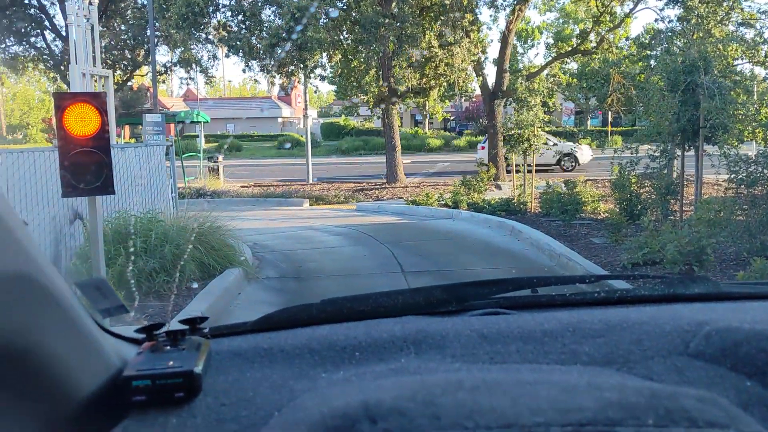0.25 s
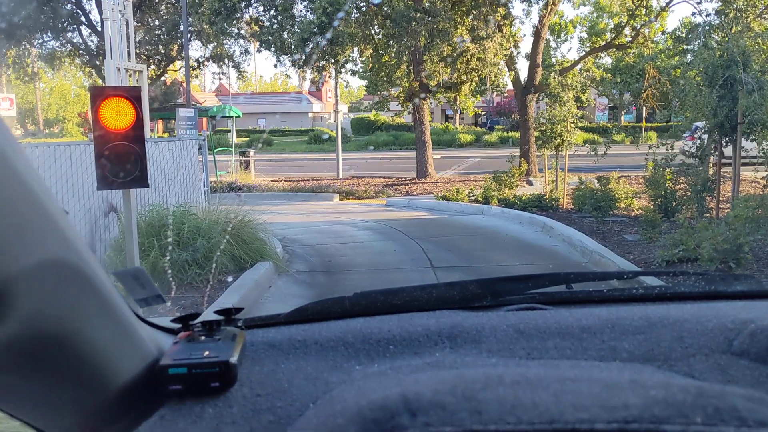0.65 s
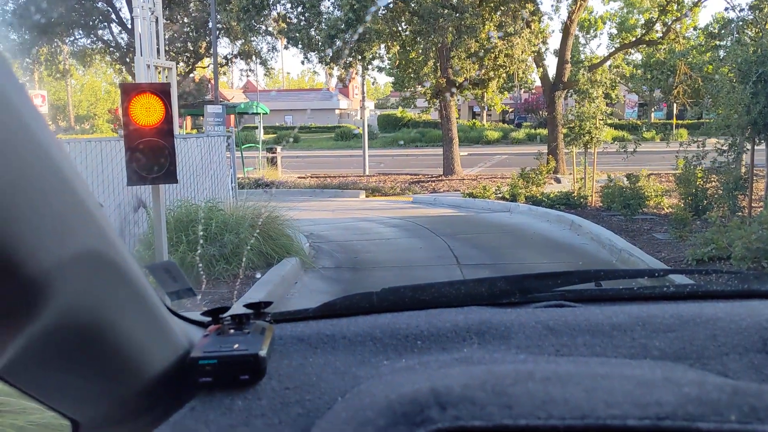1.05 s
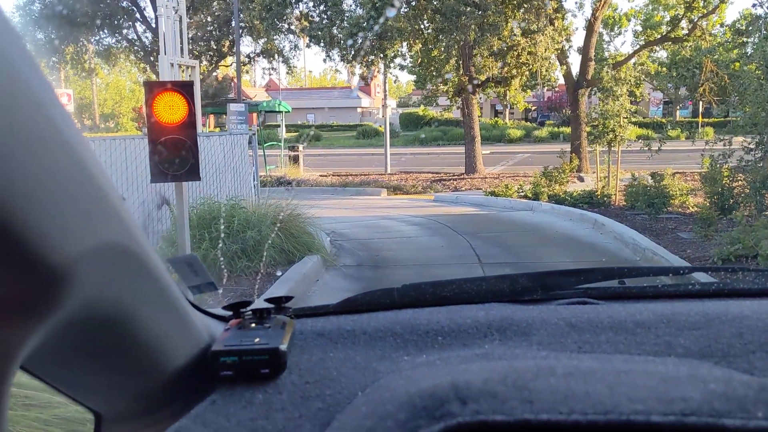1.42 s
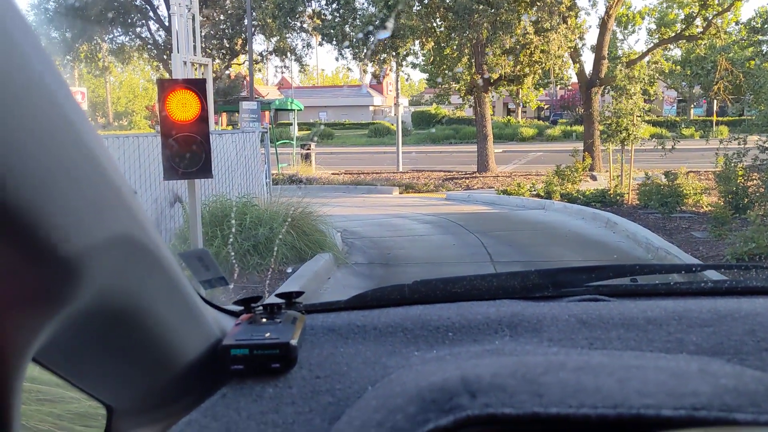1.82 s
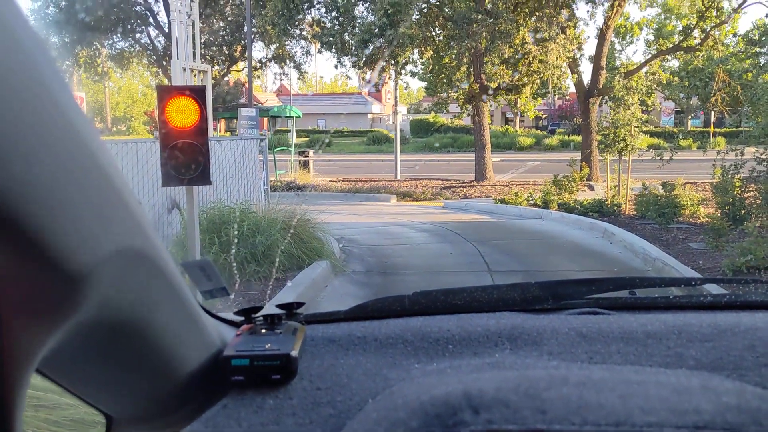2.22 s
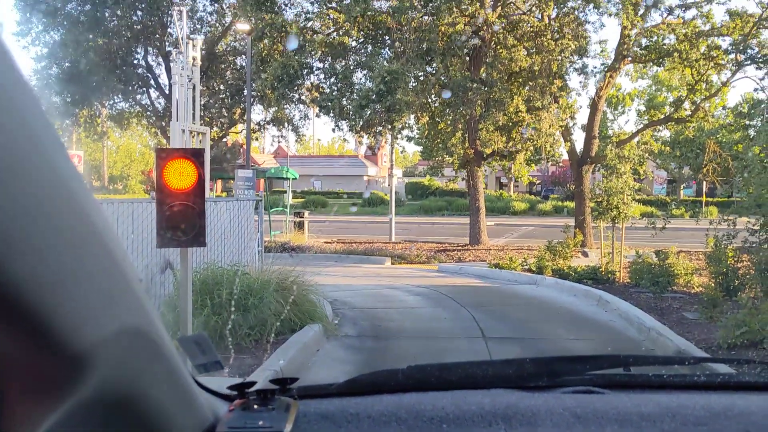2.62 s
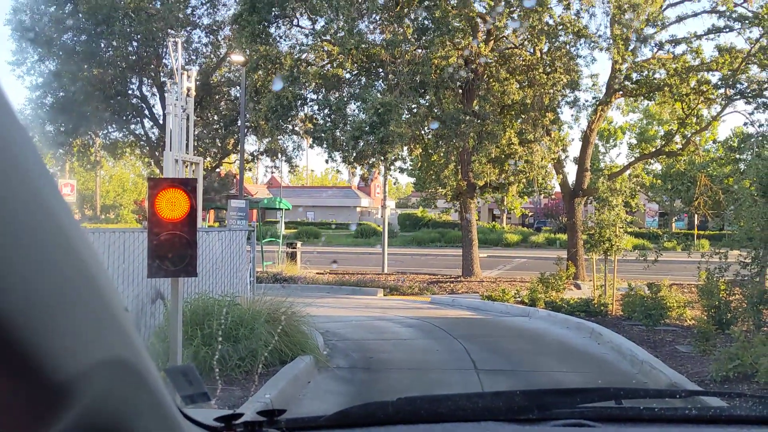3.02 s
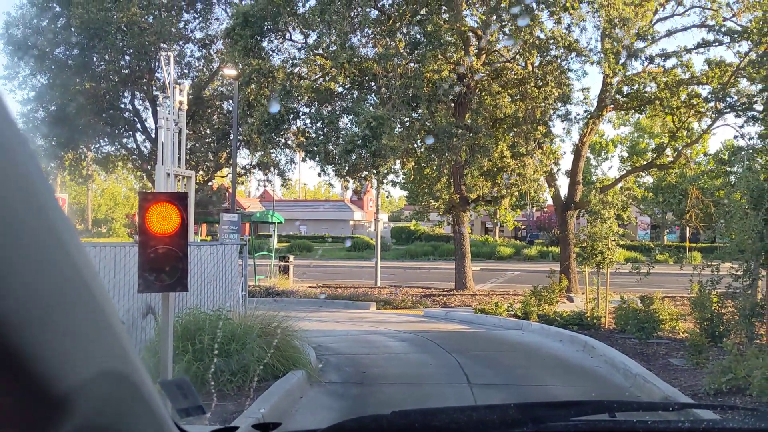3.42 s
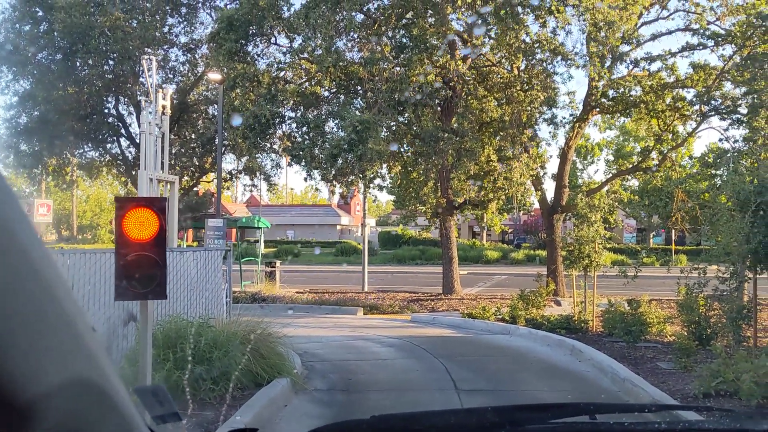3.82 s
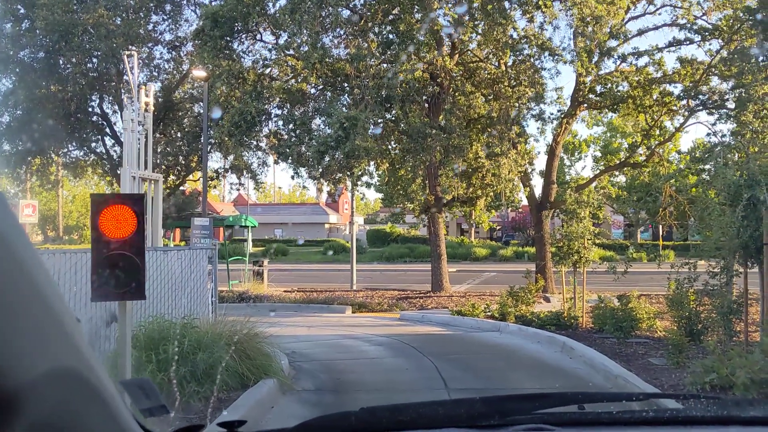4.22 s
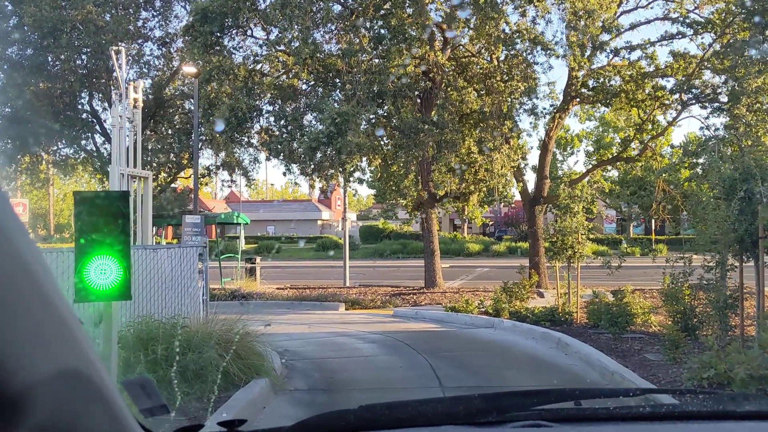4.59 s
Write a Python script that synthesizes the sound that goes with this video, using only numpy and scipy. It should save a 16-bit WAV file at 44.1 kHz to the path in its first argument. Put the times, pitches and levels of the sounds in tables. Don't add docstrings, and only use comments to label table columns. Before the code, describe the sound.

Dense, bass-heavy blower noise runs throughout, heard by a handheld phone in a small sealed car cabin. Deep boom and dulled roar dominate; high hiss from door seals and small water spits stay very faint. Near the middle the air peaks, with a tiny fluttering whistle and a firmer roof thump, then more gusts as the blast recedes a little toward the rear.

```python
import sys
import numpy as np
from scipy import signal
from scipy.fft import rfft, irfft, next_fast_len
from scipy.io import wavfile
from scipy.ndimage import uniform_filter1d, map_coordinates

SR = 44100
rng = np.random.default_rng(int(sys.argv[2]) if len(sys.argv) > 2 else 0)


def makeup_ratio(level_db):
    decades = np.asarray(level_db, float) / 20
    return 10 ** decades


def transcribe(u):
    v = np.clip(np.atleast_2d(u).T, -1, 1)
    q = np.round(v * 32767).astype(np.int16)
    wavfile.write(sys.argv[1], SR, q)


N = 214061

# t/s, length/s, level/dB
WHISTLE_CHIRPS = [(2.728, .018, -54), (2.746, .016, -53.5), (2.76, .011, -55), (2.792, .024, -55),
                  (2.815, .012, -62), (2.83, .01, -62), (2.863, .04, -54), (2.888, .02, -60),
                  (2.915, .014, -58), (2.932, .012, -60), (2.97, .035, -60), (3.02, .035, -63),
                  (3.07, .015, -64)]
# f/Hz, left density/dB per Hz, right density/dB per Hz
BOOM_SPECTRUM = [(24, -42.5, -43.5), (32, -22.5, -27.5), (42, -15.5, -13.5), (52, -4, -8), (72, -8, -8.5),
                 (85.5, -6.5, -7.5), (122, -5, -5), (133, -0.5, -3), (138, -5, -6), (151.3, -3, -5),
                 (188, -6, -12), (189, -7, -9.5), (232, -13.5, -14), (244, -11.5, -17.5)]
# f/Hz, left density/dB per Hz, right density/dB per Hz
ROAR_SPECTRUM = [(245, -2.5, -3), (270, 1, -3.5), (325, -3.5, -10), (347, -2, -2), (400, -7, -7),
                 (471, 0.5, -8), (519, -10, -12), (620, -13, -10.5), (680, -17, -12), (750, -16, -14),
                 (926, -14, -16.5), (956, -17.5, -21.5), (1140, -15.5, -23)]
# f/Hz, left density/dB per Hz, right density/dB per Hz
RUSH_SPECTRUM = [(1210, -3, -1), (1270, -3.5, -6), (1426, -2.5, -6.5), (1486, -11.5, -14.5),
                 (1800, -10, -15), (2130, -14, -20.5), (2316, -11.5, -14), (2570, -20, -19.5),
                 (2800, -16.5, -20.5), (3400, -18, -19), (3570, -22.5, -23), (4480, -24, -26.5),
                 (4800, -28, -31)]
# f/Hz, left density/dB per Hz, right density/dB per Hz
LEAK_SPECTRUM = [(4800, -1, -1.5), (5600, -3, -3), (6440, -2.5, -6), (7000, -0.5, -5.5), (7600, -6.5, -7.5),
                 (8300, -8.5, -10), (9000, -8.5, -11.5), (10500, -15.5, -17.5), (11500, -15.5, -16),
                 (12500, -12.5, -16), (14000, -13, -14.5), (15000, -14.5, -12), (15700, -18, -14.5)]
# f/Hz, likeness/0-1, left lead/rad
PORT_COHERENCE = [(50, .999, 0), (80, .985, 0), (128, .998, .03), (190, .976, 0), (235, .73, -.2),
                  (290, .91, 0), (335, .71, -.1), (440, .68, -.2), (600, .47, -.5), (900, .57, -.25),
                  (1050, .35, -1.85), (1300, .1, -2.5), (1600, .21, -2.6), (2500, .05, -1)]
# f/Hz, width/Hz, resting level/dB
SEAL_GAP = (7235, 90, -72.5)
# t/s, length/s, f/Hz, width/Hz, level/dB
TRIM_SPURTS = [
    (0.275, 0.081, 2870, 400, -47.5),
    (.27, 0.082, 8150, 400, -65),
    (.26, .04, 15000, 1195, -70.5),
    (1.12, 0.11, 14000, 2500, -67),
    (2.6, .06, 2950, 300, -56),
    (3, .1, 8500, 251.3, -73),
    (3.29, .08, 8700, 300, -66),
    (3.47, 0.13, 13900, 300, -74),
    (3.931, 0.11, 13460, 3500, -62.5),
    (4.79, .07, 14700, 2510, -67),
]
# t/s, level/dB
AIR_FLOW = [
    (0, 0),
    (.3, -0.5),
    (1.5, -0.07),
    (2.7, .5),
    (3.5, 0),
    (4.2, -1.5),
    (4.85, -2.5),
]
# t/s, length/s, cabin gain/dB, panel gain/dB
ROOF_GUSTS = [
    (0.406, 0.98, 3, 2),
    (1.197, 0.34, 0, -1),
    (2.087, 0.49, 4, -1),
    (2.753, 0.39, 1.5, 4.5),
    (3.057, 0.22, 3.5, 8.5),
    (3.45, 0.56, 4.5, 1.5),
    (3.75, .2, -0.5, 5.5),
    (4.047, 0.37, 3.5, 2.5),
]


def unit(x):
    mid = np.mean(np.atleast_2d(x), axis=0)
    return x / np.sqrt(np.mean(mid ** 2) + 1e-20)


def columns(rows, at):
    first, *cols = np.transpose(rows)
    return np.array([np.interp(at, first, c) for c in cols])


def along(rows, hz):
    rows = np.array(rows, float)
    log_rows = np.c_[np.log(rows[:, 0]), rows[:, 1:]]
    return columns(log_rows, np.log(hz + 1e-3))


def bell(centre_s, length_s):
    return np.exp(-2 * ((np.arange(N) / SR - centre_s) / (length_s / 2)) ** 2)


def swell(centre_s, length_s, peak_db):
    return makeup_ratio(peak_db) * bell(centre_s, length_s)


def wobble(knots_per_s):
    knots = rng.standard_normal((2, 400))
    place = np.arange(N) * knots_per_s / SR
    return np.array([map_coordinates(k, [place]) for k in knots])


def flow_db():
    return columns(AIR_FLOW, np.arange(N) / SR)[0]


def air(spectrum, lo_hz, hi_hz, patchy_db):
    z = signal.stft(rng.standard_normal((2, N + 4096)), nperseg=512)[2]
    patches = rng.standard_normal(z.shape[1:])
    patches = uniform_filter1d(uniform_filter1d(patches, 8, 0), 12, 1)
    pair = signal.istft(z * makeup_ratio(patchy_db * patches / patches.std()), nperseg=512)[1]

    size = next_fast_len(pair.shape[1])
    hz = np.fft.rfftfreq(size, 1 / SR)
    shared, opposed = rfft(pair, size)
    alike, lead_rad = along(PORT_COHERENCE, hz)
    mix_rad = np.arccos(np.clip(alike, 0, 1)) / 2
    ports = shared * np.cos(mix_rad) + [[1], [-1]] * (opposed * np.sin(mix_rad))[None]
    ports = ports * np.exp([[.5j], [-.5j]] * lead_rad[None])

    edges = 1 / np.sqrt((1 + (lo_hz / (hz + 1)) ** 24) * (1 + (hz / hi_hz) ** 24))
    sound = irfft(ports * makeup_ratio(along(spectrum, hz)) * edges, size)
    return unit(sound[:, 2048:N + 2048])


def ringing(centre_hz, width_hz):
    hz = np.fft.rfftfreq(N, 1 / SR)
    resonance = 1j * hz * width_hz / (centre_hz ** 2 - hz ** 2 + 1j * hz * width_hz)
    shared, own = rng.standard_normal(N), rng.standard_normal((2, N))
    return unit(irfft(rfft(shared + .6 * own) * resonance ** 2, N))


def mode(centre_hz, width_hz, level_db):
    both_ports = ringing(centre_hz, width_hz).sum(axis=0)
    return makeup_ratio(level_db) * unit(both_ports) * makeup_ratio([[1.2], [-1.2]])


def spurts():
    total = 0
    for centre_s, length_s, hz, width_hz, level_db in TRIM_SPURTS:
        total = total + swell(centre_s, length_s, level_db) * ringing(hz, width_hz)
    return total * makeup_ratio([[2.5], [-2.5]])


def seals():
    flow = flow_db()
    flutter_db = .4 * wobble(7)[0]
    hiss_db = -57.5 + .9 * flow + flutter_db
    lift_db = 2 * bell(3.3, .8)
    fizz_db = -66.5 + 1.3 * flow + flutter_db + lift_db
    hiss = makeup_ratio(hiss_db) * air(LEAK_SPECTRUM, 4820, 11500, patchy_db=0.9)
    fizz = makeup_ratio(fizz_db) * air(LEAK_SPECTRUM, 11500, 16500, patchy_db=0.5)

    centre_hz, width_hz, rest_db = SEAL_GAP
    ring = ringing(centre_hz, width_hz)
    tone_hz = centre_hz + 25 * wobble(60)[0]
    tone = np.sqrt(2) * np.sin(2 * np.pi * np.cumsum(tone_hz) / SR)
    chirps = sum(swell(*row) for row in WHISTLE_CHIRPS) * (1.05 * tone + .3 * ring)
    gap = makeup_ratio(rest_db + .7 * flow) * ring + chirps
    return hiss + fizz + gap * makeup_ratio([[1.5], [-1.5]])


def blades():
    blade_hz, blade_db, overtone_db = 584, -37, -15.5
    beat_period_s, beat_peak_s, beat_depth_db = .7, 1.966, 3
    t = np.arange(N) / SR
    beat_db = beat_depth_db * np.cos(2 * np.pi * (t - beat_peak_s) / beat_period_s)
    phase = 2 * np.pi * np.cumsum(blade_hz + .5 * wobble(3)[0]) / SR
    tone = makeup_ratio(1.1 * wobble(3)) * np.sin(phase + 1.2 * wobble(3))
    overtone = makeup_ratio(overtone_db + 3.3 * wobble(4.5)) * np.sin(2 * phase + 1.5 * wobble(5))
    return np.sqrt(2) * makeup_ratio(blade_db + beat_db) * (tone + overtone)


def jets():
    flow = flow_db()
    roar = makeup_ratio(-22.5 + .8 * flow) * air(ROAR_SPECTRUM, 241, 1170, patchy_db=-0.1)
    rush = makeup_ratio(-39.3 + 1.05 * flow) * air(RUSH_SPECTRUM, 1168, 4930, patchy_db=0.5)
    return roar + rush


def drumming():
    heave_db = -22 + 0.75 * np.arange(N) / SR
    cabin_db, panel_db = -17.5, -24
    for centre_s, length_s, cabin_gain_db, panel_gain_db in ROOF_GUSTS:
        gust = bell(centre_s, length_s)
        cabin_db = cabin_db + cabin_gain_db * gust
        panel_db = panel_db + panel_gain_db * gust
    heave = air(BOOM_SPECTRUM, 16, 100, patchy_db=.2)
    cabin = air(BOOM_SPECTRUM, 100, 170, patchy_db=.2) + mode(128, 12.8, -7.5)
    panel = air(BOOM_SPECTRUM, 170, 245, patchy_db=.2) + mode(196, 17, -8.5)
    return makeup_ratio(heave_db) * heave + makeup_ratio(cabin_db) * cabin + makeup_ratio(panel_db) * panel


def scene():
    return spurts() + seals() + blades() + jets() + drumming()


def roll_off(x):
    return signal.sosfilt(signal.butter(12, 15780, fs=SR, output="sos"), x)


def record(dry):
    ceiling = 1.14
    rounded = dry / (1 + np.abs(dry / ceiling) ** 8) ** (1 / 8)
    return roll_off(rounded)


dry = scene()
out = record(dry)
transcribe(out)
```